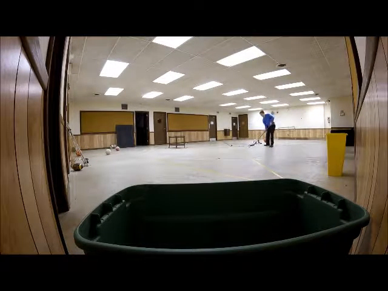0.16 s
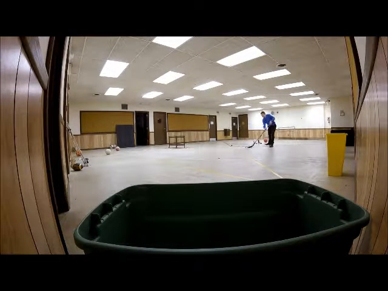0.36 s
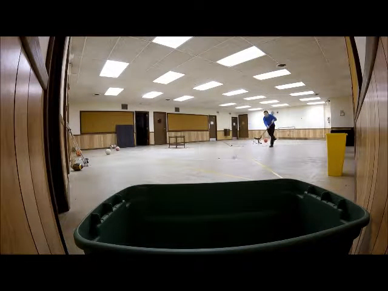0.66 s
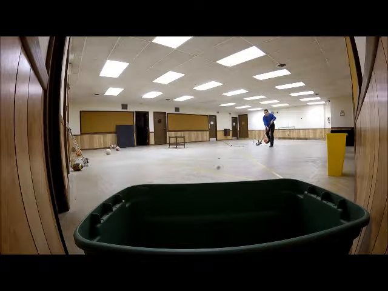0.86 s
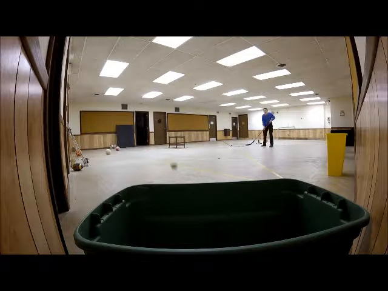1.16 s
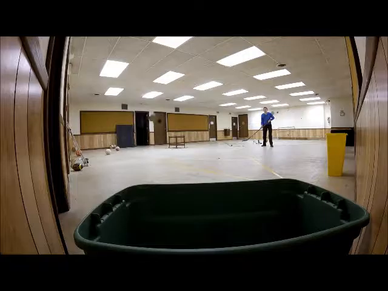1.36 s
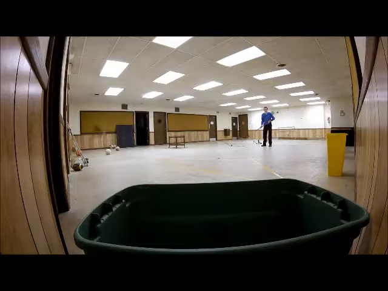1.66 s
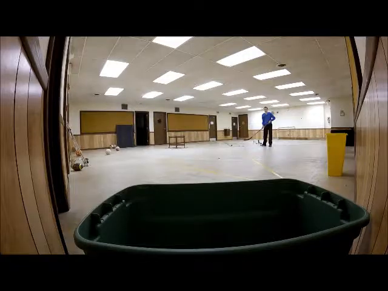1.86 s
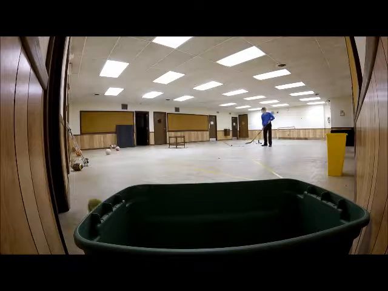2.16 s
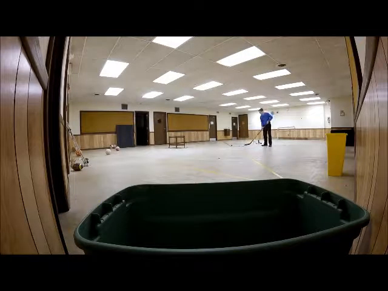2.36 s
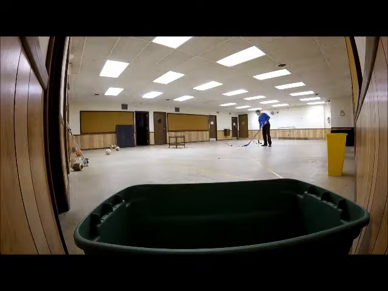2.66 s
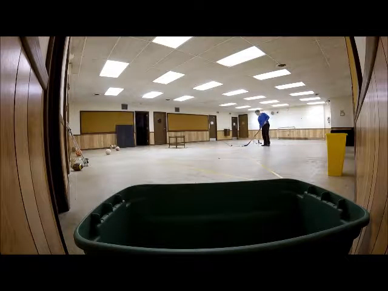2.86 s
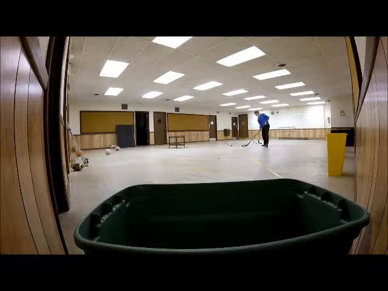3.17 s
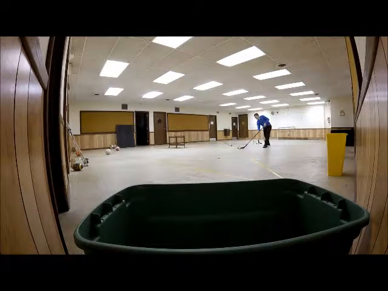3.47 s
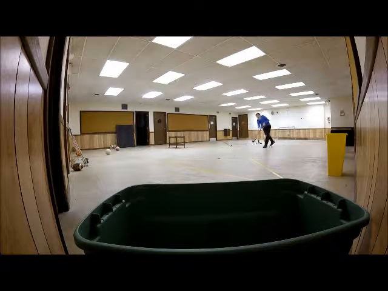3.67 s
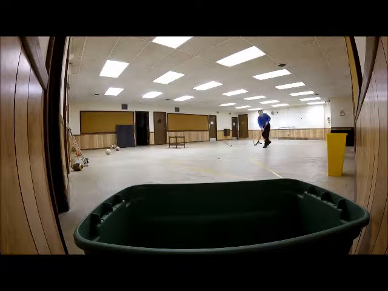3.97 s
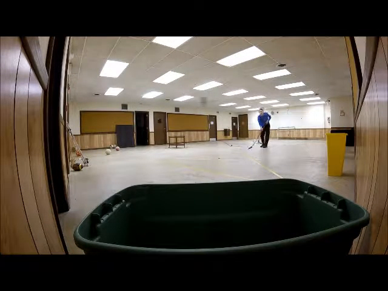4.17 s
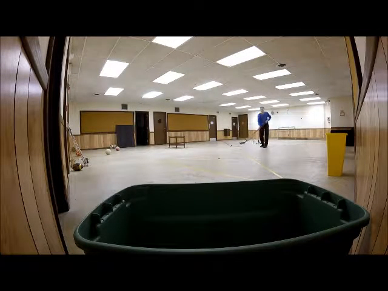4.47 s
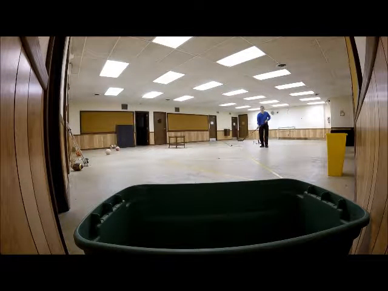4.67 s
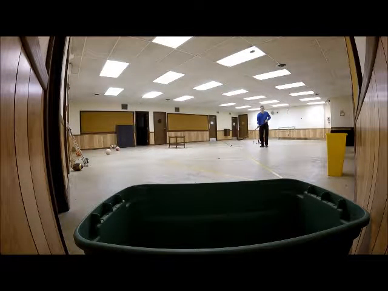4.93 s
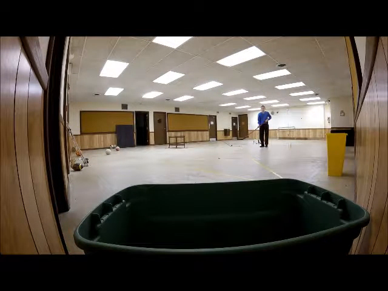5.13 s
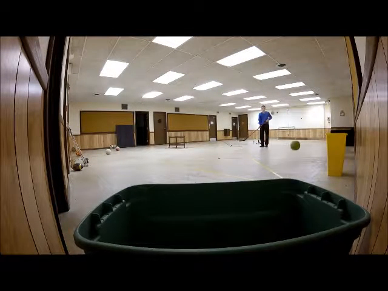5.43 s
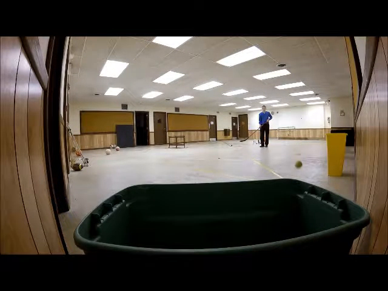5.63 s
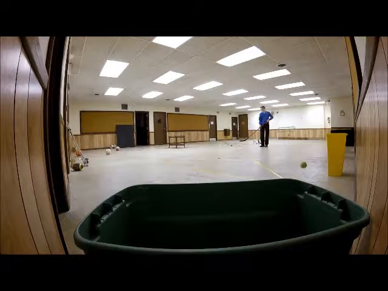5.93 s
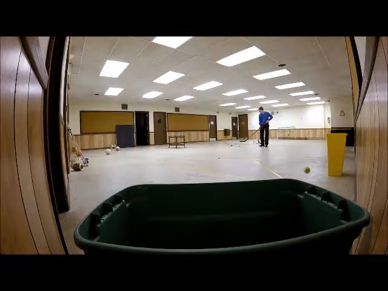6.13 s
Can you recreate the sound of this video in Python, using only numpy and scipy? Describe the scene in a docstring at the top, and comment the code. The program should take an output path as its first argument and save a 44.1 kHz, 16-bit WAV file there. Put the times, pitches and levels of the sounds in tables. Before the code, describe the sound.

A hockey stick clacks balls across an echoing hall; they thump, rattle loose metal and boom against a nearby plastic bin.

```python
"""First comes a hollow boom over rumbling ventilation: a tennis ball hits a plastic bin's soft walls.
At the far end of an empty, echoing hall, a hockey stick scrapes and clacks as it sweeps two balls
off the hard floor. They thump down close by in a wooden doorway, set a loose metal fitting
rattling and boom against the bin again. After the heaviest blow the bin rocks, and an automatic
gain control turns everything down and lets it creep back."""
import sys
import numpy as np
from scipy import signal
from scipy.fft import rfft, irfft, next_fast_len
from scipy.io import wavfile
from scipy.ndimage import uniform_filter1d, minimum_filter1d

SR = 44100
rng = np.random.default_rng(int(sys.argv[2]) if len(sys.argv) > 2 else 0)


def output_pcm(signal):
    """Save a mono or channel-first signal as 16-bit PCM at the path in sys.argv[1].

    Samples are clipped to [-1, 1] before scaling.
    """
    pcm = np.clip(np.atleast_2d(signal).T, -1, 1) * 32767
    wavfile.write(sys.argv[1], SR, np.round(pcm).astype(np.int16))


N = 277830
TIME = np.arange(N) / SR
AGE = TIME[:SR]  # one second, counted from a blow
TOP_HZ = 15480  # nothing higher is heard


def amp(db):
    """Turns decibels into a number to multiply by."""
    return 10 ** (np.asarray(db) / 20)


def unit(x):
    """Scales a sound so its average strength (rms) is 1."""
    return x / np.sqrt(np.mean(x ** 2) + 1e-20)


def unit_peak(x):
    """Scales a sound so its peak is 1."""
    return x / np.abs(x).max()


def along(points, hz):
    """Reads a curve of (frequency, value) points, with octaves evenly spaced."""
    f, v = np.transpose(points)
    return np.interp(np.log(hz + 1), np.log(f + 1), v)


def fade(t60, t=AGE):
    """Dies away by 60 dB in t60 seconds, the 'fade' of the tables."""
    return amp(-60 * t / t60)


def filtered(x, response):
    """Turns each frequency up or down by response(hz)."""
    size = next_fast_len(len(x) + SR // 4)
    return irfft(rfft(x, size) * response(np.fft.rfftfreq(size, 1 / SR)), size)[:len(x)]


def coloured(x, spectrum):
    """Gives a sound a tone colour (a level for each frequency), at strength 1."""
    return unit(filtered(x, lambda hz: amp(along(spectrum, hz))))


def narrow(centre, width):
    """Noise gathered around one pitch, at strength 1."""
    return unit(filtered(rng.standard_normal(N), lambda hz: 1 / (1 + (2 * (hz - centre) / width) ** 2)))


def burst(spectrum, t60, rise):
    """The dying noise of one contact."""
    return coloured(rng.standard_normal(SR), spectrum) * fade(t60) * (1 - np.exp(-AGE / rise))


def ring(hz, t60, rise):
    """One note of a struck object: it swells while the contact lasts, then dies."""
    return np.sin(2 * np.pi * hz * AGE) * fade(t60) * (1 - np.exp(-(AGE / rise) ** 2))


def add(track, s, sound):
    """Mixes a sound into the track, s seconds in."""
    start = max(0, round(s * SR))
    track[start:start + len(sound)] += sound[:N - start]


# tone colour of the moving air: f/Hz, level/dB
AIR_COLOUR = [(20, 0.5), (60, -3), (110, -5.5), (170, -13), (280, -23.5), (380, -30.5), (600, -35),
              (1000, -40), (2500, -45.5), (5000, -51.5), (9000, -58.5), (11000, -62.5), (13000, -68.5),
              (15000, -79.5)]
# the low drone: f/Hz, width/Hz, level/dB
DRONE = (87, 17.4, -41.5)
# two close pitches that beat in a thin whine: f/Hz, level/dB
WHINE = [(9620, -89), (9652, -91)]
def ventilation(air_db=-35.5):
    """Air rumbles and hisses steadily, with a low drone and a thin whine."""
    hz, width, db = DRONE
    whine = sum(amp(level) * narrow(pitch, width=11) for pitch, level in WHINE)
    air = amp(air_db) * coloured(rng.standard_normal(N), AIR_COLOUR)
    return air + amp(db) * narrow(hz, width) + whine


# the bin's own notes: f/Hz, level/dB, fade/s
BIN_NOTES = [(22.15, 2.5, 2.04), (37, 9.5, 1.5), (82, 2.5, 0.11), (92.3, 6, 0.16), (108.2, -2.5, 0.35),
             (143.9, -16.5, 0.28), (166.4, 0, 0.21), (200.4, 6.5, 0.17), (228.7, -6, 0.24),
             (256.8, -17.5, 0.27), (304, -3.5, .1), (328, -17, .3), (400, -23, .15), (475, -28, .1)]
# tone colour of its hollow body, many crowded higher notes: f/Hz, level/dB
BODY_COLOUR = [(120, -36), (240, 1), (340, -2.5), (420, -13.5), (560, -17.5), (900, -32), (3000, -40.5),
               (10000, -58.5)]
# booms of the bin, from ball hits and then its rocking after the heaviest blow:
# t/s, level/dB, favoured f/Hz, spread/octaves, body level/dB
BIN_BOOMS = [(.001, -2.5, 185, 0.77, -25), (0.08, -6, 134.6, 0.51, -46), (.325, -23.5, 190, 0.43, -58),
             (2.057, -8.5, 92, 0.65, -44.5), (2.452, -13.5, 157.7, 0.24, -54), (3.151, -13, 96, 0.14, -45),
             (5.493, 5.5, 109.4, 0.58, -28), (5.4987, -0.5, 210, 0.31, -36), (5.525, -14, 213, 0.27, -35),
             (5.554, -8, 45, 0.33, -45), (5.593, -2.5, 50, 0.94, -38), (5.606, -18.5, 225, 0.37, -46)]
def plastic_bin(contact=0.002, scatter_db=1):
    """The bin's soft walls boom; the spot that is knocked decides which notes answer."""
    out = np.zeros(N)
    hz, level, t60 = np.transpose(BIN_NOTES)[:, :, None]
    for s, db, centre_hz, spread, body_db in BIN_BOOMS:
        share = np.exp(-.5 * (np.log2(hz / centre_hz) / spread) ** 2)
        strength = share * amp(level + scatter_db * rng.standard_normal(hz.shape))
        notes = strength * ring(hz, t60, rise=contact / spread)  # a longer contact wakes fewer notes
        body = amp(body_db) * burst(BODY_COLOUR, t60=0.27, rise=.004)
        add(out, s, amp(db) * unit_peak(notes.sum(axis=0)) + body)
    return out


# how long the hall rings: f/Hz, fade/s
HALL_FADES = [(60, 0.82), (250, 0.72), (1000, .5), (2000, 0.63), (3000, 1), (5000, 0.8), (9000, 0.3)]
def hall(x, steps=21, build_s=0.00096):
    """The hall's wash of echoes; each frequency dies at its own speed."""
    out = np.zeros(N)
    hz, t, noise = signal.stft(rng.standard_normal((steps + 1, SR)), SR, nperseg=256)
    dying = noise * fade(along(HALL_FADES, hz)[:, None], t)
    tails = signal.istft(dying, SR, nperseg=256)[1][:, :SR] * (1 - np.exp(-AGE / build_s))
    # each echo tail blends into a fresh one, so no pitch rings out
    for k, tail in enumerate(tails):
        away = np.abs(TIME / TIME[-1] * steps - k)
        near = away < 1
        piece = x[near] * np.cos(np.pi / 2 * away[near])
        add(out, TIME[near][0], signal.fftconvolve(piece, tail / np.linalg.norm(tail)))
    return out


def thump(s, hz, lag=1.884):
    """A squashed ball pushes the air, draws it in and pushes again as it springs back."""
    phase = np.pi * hz * (TIME - s) - lag
    return (2 * phase ** 2 - 1) * np.exp(-phase ** 2)


# tone colour of slapping felt: f/Hz, level/dB
FELT_COLOUR = [(300, 23.5), (500, 14.5), (800, 0.5), (1700, 7.5), (3000, 7.5), (4500, -5), (6500, -17),
               (10000, -19.5), (15000, -68)]
# balls hitting floor, wall or doorway:
# t/s, thump level/dB, thump f/Hz, slap level/dB, ping level/dB, ping fade/s, hall share/dB
BOUNCES = [(.097, -7.5, 188, -43, -47, .013, -8.5), (1.231, -31, 228, -40, -54.5, 0.013, 6.5),
           (1.3188, -11, 150, -47, -46, 0.014, -4.5), (1.324, -13, 110, -52, -39, .012, -20),
           (1.413, -20, 180, -49, -60, 0.012, 0), (2.041, -13, 186, -28.5, -29.5, 0.0053, -15.5),
           (2.046, -4, 134, -53, -42, 0.011, -3.5), (2.129, -20, 234, -34, -32.5, 0.016, -7.5),
           (2.6661, -15, 177, -41, -32, 0.018, -6), (3.062, -14, 160, -57, -37, 0.019, -7),
           (3.357, -21, 170, -58, -41, 0.02, -5), (4.22, -9, 156, -27, -41.5, .05, -0.5),
           (5.3996, -1, 157.4, -29.5, -44, 0.014, -12), (5.49, -6, 150, -29, -42, .011, -11),
           (5.994, -17.5, 164, -41.5, -48.5, 0.093, -8.5)]
def balls(ping_hz=1250, floor_db=-11, floor_hz=68, bin_air_db=-17, bin_air_hz=212):
    """A ball thumps, its shell pings, its felt slaps; returns the near sound and the hall's share."""
    near, slaps, to_hall = np.zeros((3, N))
    for s, db, hz, slap_db, ping_db, ping_t60, hall_db in BOUNCES:
        push = amp(db) * thump(s, hz)
        pitch = ping_hz * (1 + 0.011 * rng.standard_normal())
        shell = amp(ping_db) * ring(pitch, t60=ping_t60, rise=0.00014)
        felt = amp(slap_db) * burst(FELT_COLOUR, t60=0.026, rise=0.00047)
        # the struck surface thuds and the air in the bin rings along
        thud = amp(floor_db) * ring(floor_hz, t60=.07, rise=.004)
        bin_air = amp(bin_air_db) * ring(bin_air_hz, t60=.11, rise=0.012)
        near += push
        add(near, s, shell + amp(db) * (thud + bin_air))
        add(slaps, s, felt)
        to_hall += amp(hall_db) * push
        add(to_hall, s, amp(hall_db - 9) * (shell + felt))
    return near + doorway(slaps), to_hall


# echoes off the floor and the doorway: delay/s, level/dB
NEAR_ECHOES = [(.0085, -5.5), (0.0113, -6.5), (0.0157, -14), (.024, -19), (.034, -14.5)]
def doorway(x):
    """A sound plus its quick echoes off the nearest surfaces."""
    out = x.copy()
    for delay, db in NEAR_ECHOES:
        add(out, delay, amp(db) * x)
    return out


# tone colours of the scraping blade, the hissing grit and the bent stick's hum: f/Hz, level/dB
SCRAPE_COLOUR = [(300, -12), (600, 10), (900, -3.5), (1300, 8.5), (1800, -13), (2400, -5), (3100, 1),
                 (4200, 2.5), (5200, -3), (7000, -27), (12000, -47)]
GRIT_COLOUR = [(1500, -32), (3500, -20), (5500, 3), (6700, 2), (8300, 4), (10000, -19), (14000, -21)]
HUM_COLOUR = [(80, -4), (200, -2), (350, -8.5), (550, -31.5), (900, -28), (2000, -72)]
HEEL, TOE = (1970, 1560), (2920, 1500)  # the ring of the blade's back end and tip: f/Hz, width/Hz
# sweeps over the floor: t/s, pressing down/s, hold/s, lies flat t/s,
# scrape level/dB, blade level/dB, grit level/dB, hum level/dB
SWEEPS = [(0.29, 0.187, 0.056, .445, -60.5, -55, -69, -41.5),
          (3.452, 0.169, 0.076, 3.53, -57, -56, -70.5, -41)]
def stick_sweeps(touch_db=-14.5, toe_db=-1.5, lift_db_per_s=900, hum_fall_db_per_s=160):
    """The blade presses down, drags over the floor's grit in many tiny slips and lifts."""
    out = np.zeros(N)
    grain, scrape_growth, grit_growth = 0.25, 1.9, 0.27
    for s, press_s, hold, flat_s, scrape_db, blade_db, grit_db, hum_db in SWEEPS:
        age = TIME - s
        contact = np.clip(1 + age / 0.042, 0, 1)
        press_db = touch_db * np.clip(1 - age / press_s, 0, 1)
        lifted_s = np.maximum(age - press_s - hold, 0)
        force_db = press_db - lift_db_per_s * lifted_s
        slips = rng.standard_normal((2, N))
        slips *= np.exp(grain * np.repeat(rng.standard_normal(N // 64 + 1), 64)[:N])
        # the blade's ring climbs as the contact rolls from heel to toe
        roll = np.pi / 2 * np.clip((age - press_s) / hold, 0, 1) ** 2
        ringing = np.cos(roll) * narrow(*HEEL) + amp(toe_db) * np.sin(roll) * narrow(*TOE)
        blade = amp(force_db + blade_db) * ringing
        scrape = amp(scrape_growth * force_db + scrape_db) * coloured(slips[0], SCRAPE_COLOUR)
        grit = (TIME > flat_s) * amp(grit_growth * force_db + grit_db) * coloured(slips[1], GRIT_COLOUR)
        # the bent stick hums on a little after it lifts
        hum_gain = amp(hum_db + press_db - hum_fall_db_per_s * lifted_s)
        hum = hum_gain * coloured(rng.standard_normal(N), HUM_COLOUR)
        out += contact * (scrape + blade + grit + hum)
    return out


# tone colour of the blade's crack: f/Hz, level/dB
CRACK_COLOUR = [(400, -10), (1200, 24.5), (1900, 24.5), (3000, 17.5), (4800, 17), (6500, 6), (9000, -18),
                (14000, -61)]
# the blade's blows: t/s, crack level/dB, rise/s, knock level/dB, knock f/Hz, ring level/dB
CLACKS = [(.52, -42.5, 0.0005, -21.5, 199, -47), (2.675, -49.5, 0.0022, -31.5, 153, -54),
          (3.534, -48.5, 0.0017, -33.5, 270, -62), (3.587, -50.5, .001, -30, 260, -52),
          (3.603, -54, 0.0022, -24.5, 235, -47.5), (3.622, -42, 0.0055, -23, 252, -45),
          (3.637, -54, 0.0029, -23.5, 245, -55)]
def stick_clacks():
    """The blade hits floor and ball with a crack, a short ring and a low knock."""
    out = np.zeros(N)
    for s, db, rise, knock_db, knock_hz, ring_db in CLACKS:
        blade = amp(ring_db) * narrow(TOE[0], width=860)[:SR] * fade(0.074) * (1 - np.exp(-AGE / rise))
        add(out, s, amp(db) * burst(CRACK_COLOUR, t60=0.054, rise=rise) + blade)
        out += amp(knock_db) * thump(s, knock_hz)
    return out


# the metal fitting's own notes: f/Hz, level/dB, fade/s
METAL_NOTES = [(2705, -3, 0.058), (2840, -7, 0.046), (3100, 1, .045), (3304, 5, 0.043), (3356, 4.5, 0.063),
               (3453, 5, 0.028), (3750, -1.5, 0.066), (3854, 4.5, 0.025), (3830, -5, 0.038),
               (4520, -5.5, 0.036), (5200, -4.5, 0.044), (5900, -13, 0.036), (7900, -4, .025)]
# tone colours of its hard tick and its noisy jangle: f/Hz, level/dB
TICK_COLOUR = [(1500, -13), (5000, 0), (10000, -6), (15000, -33.5)]
JANGLE_COLOUR = [(800, -34), (1900, -11.5), (2400, -6), (2750, 4), (3400, 2), (4300, -1), (5300, -6),
                 (6700, -17), (8000, -10), (10000, -25.5), (15000, -41)]
def chink(ring_db=-5, jangle_db=-10, tick_db=-12, scatter_db=1):
    """Each knock holds the loose metal differently, so its notes vary in strength and pitch."""
    hz, level, t60 = np.transpose(METAL_NOTES)[:, :, None]
    strength, phase, shift = rng.standard_normal((3, *hz.shape))
    pitch = hz * (1 + 0.0035 * shift)
    notes = amp(level + scatter_db * strength) * np.sin(2 * np.pi * (pitch * AGE + phase)) * fade(t60)
    tone = unit_peak(notes.sum(axis=0)) * (1 - np.exp(-AGE / 0.00027))
    tick = amp(tick_db) * burst(TICK_COLOUR, t60=.008, rise=.0001)
    jangle = amp(jangle_db) * burst(JANGLE_COLOUR, t60=0.066, rise=0.00055)
    return tick + amp(ring_db) * tone + jangle


# knocks of the loose fitting: t/s, level/dB, dull above f/Hz
RATTLES = [(1.243, -42.5, 9000), (1.326, -32, 9000), (1.332, -22, 12100), (1.387, -40, 14000),
           (1.438, -29.5, 7700), (1.5014, -28, 8420), (1.568, -29, 8100), (1.605, -39, 5000),
           (1.616, -36.5, 4450), (1.627, -38.5, 4500), (4.259, -32.5, 7860), (4.2844, -25, 11820),
           (4.342, -27, 6400), (4.375, -30, 11000), (4.429, -44, 12000), (4.503, -38.5, 5000),
           (4.524, -42, 4500), (4.545, -37.5, 5800), (4.555, -43, 5530)]
# its faint trembling: start t/s, end t/s, level/dB
TREMBLES = [(1.252, 1.325, -64.5), (4.22, 4.494, -62)]
def fitting(touches_per_s=940):
    """The loose metal knocks, softer knocks mostly duller, and trembles too lightly to ring."""
    out = np.zeros(N)
    for s, db, dull_hz in RATTLES:
        lowpass = signal.butter(2, min(dull_hz, TOP_HZ), fs=SR)
        add(out, s, amp(db) * signal.lfilter(*lowpass, chink()))
    trembling = sum(amp(db) * ((TIME > start) & (TIME < end)) for start, end, db in TREMBLES)
    touches = (rng.random(N) < touches_per_s / SR) * rng.uniform(-1.3, 1, N)
    return out + trembling * coloured(touches, JANGLE_COLOUR)


# tone colour of the wood that carries the fitting: f/Hz, level/dB
PANEL_COLOUR = [(60, 0), (150, 7), (280, 0.5), (400, -5), (600, -24), (1300, -28.5), (2500, -50.5)]
def panel(offset_db=-9, follow=0.87):
    """Each knock of the fitting also shakes its wooden panel."""
    out = np.zeros(N)
    loudest = max(db for _, db, _ in RATTLES)
    for s, db, _ in RATTLES:
        shake_db = loudest + follow * (db - loudest) + offset_db
        add(out, s, amp(shake_db) * burst(PANEL_COLOUR, t60=0.51, rise=0.0017))
    return out


# brief, hard clicks: t/s, level/dB, f/Hz, fade/s
CLICKS = [(2.048, -33, 2670, 0.0028), (2.454, -38, 5080, 0.0037), (2.676, -41, 4700, .006),
          (5.399, -25, 2400, .005), (5.4098, -29, 3100, 0.0065), (5.424, -46.5, 3270, .025),
          (5.452, -44, 3160, 0.0066), (5.502, -2.5, 475, 0.0057), (5.5023, -25, 6500, .0006),
          (5.545, -23, 2800, 0.0014)]
def clicks():
    """Brief, hard clicks at the blows; the loudest is the recorder overloading on the heaviest boom."""
    out = np.zeros(N)
    for s, db, hz, t60 in CLICKS:
        add(out, s, amp(db) * ring(hz, t60, rise=0.00027))
    return out


def scene():
    """The far stick sends much of its sound into the hall; the near bin and metal send little."""
    stick = stick_sweeps() + stick_clacks()
    bounces, bounces_to_hall = balls()
    booms = plastic_bin()
    metal = doorway(fitting())
    direct = amp(5.5) * stick + bounces + booms + clicks() + metal + panel()
    echo = hall(amp(2.5) * stick + bounces_to_hall + amp(-19) * booms + amp(-16) * metal)
    return direct + echo + ventilation()


def record(dry, ceiling_db=0.0, release_db_per_s=17, start_duck_db=7, hold_s=0.0054):
    """Gain control starts low, ducks at peaks, holds and creeps back; the highest treble is cut."""
    over_db = np.maximum(20 * np.log10(np.abs(dry) + 1e-9) - ceiling_db, 0)
    recovery_db = release_db_per_s * TIME
    duck_db = np.maximum.accumulate(np.maximum(over_db + recovery_db, start_duck_db)) - recovery_db
    half_hold = int(hold_s * SR / 2)
    gain_db = minimum_filter1d(-duck_db, 2 * half_hold + 1, origin=half_hold, mode="nearest")
    # a short look-ahead lets the gain glide down before the peak arrives
    gain_db = uniform_filter1d(minimum_filter1d(gain_db, size=128), size=128)
    return filtered(dry * amp(gain_db), lambda hz: hz < TOP_HZ)


dry = scene()
out = record(dry)
output_pcm(out)
```